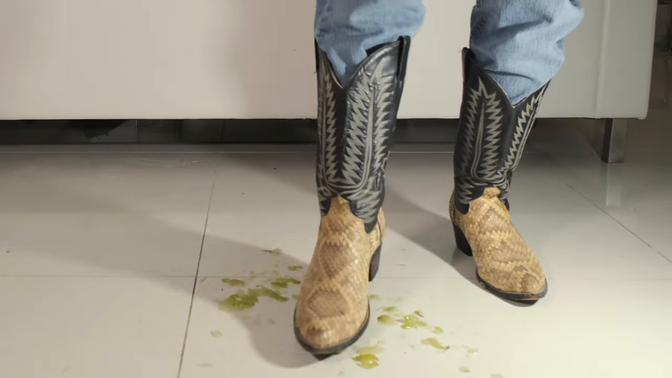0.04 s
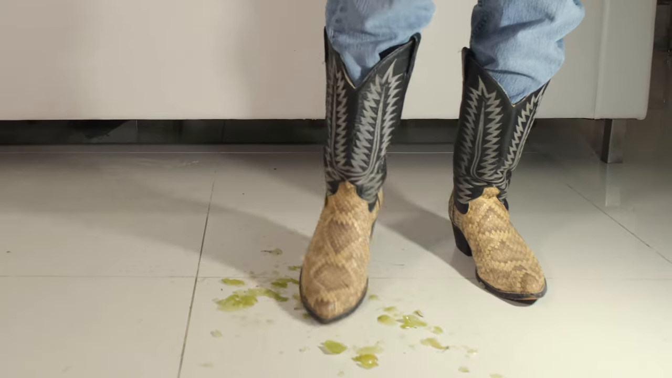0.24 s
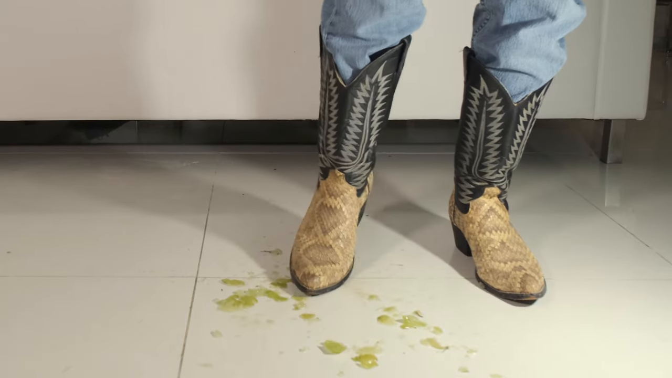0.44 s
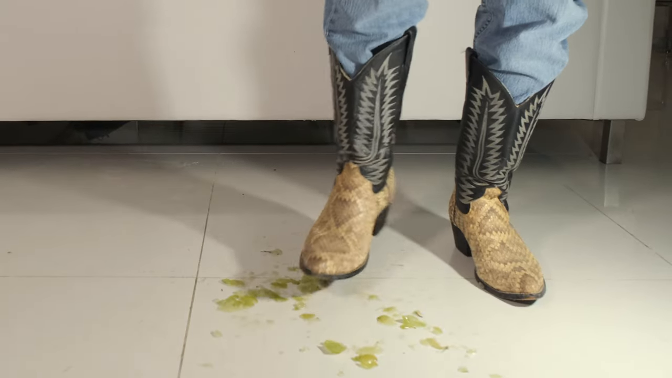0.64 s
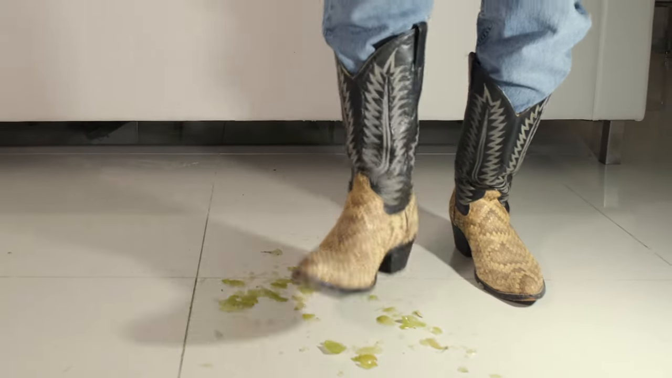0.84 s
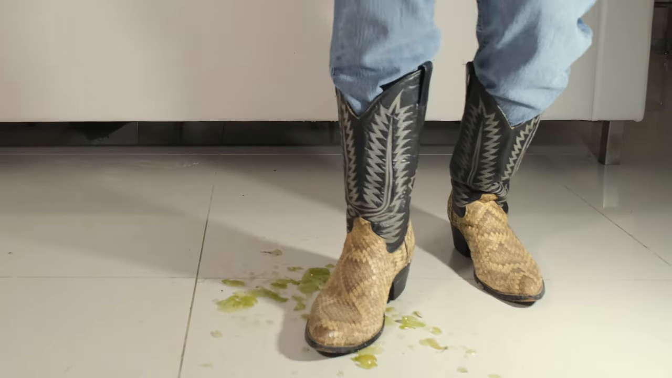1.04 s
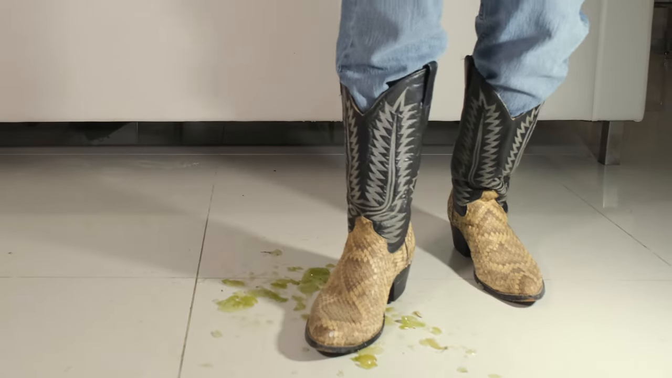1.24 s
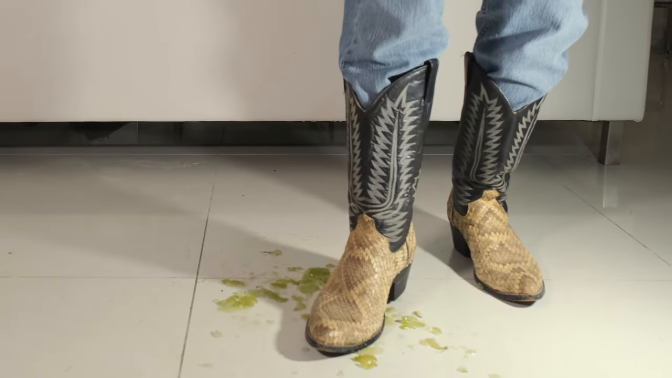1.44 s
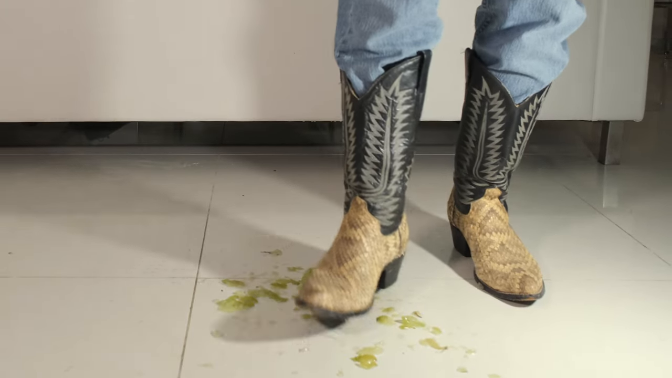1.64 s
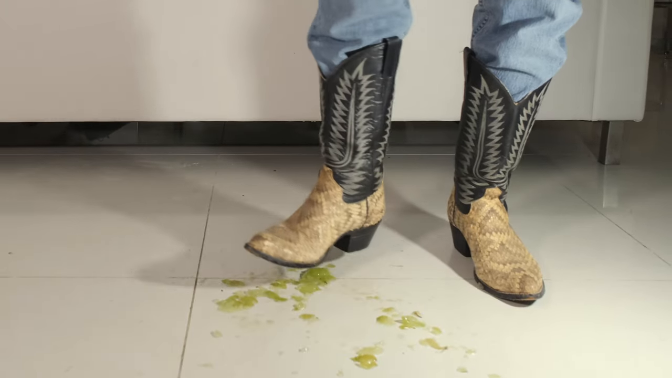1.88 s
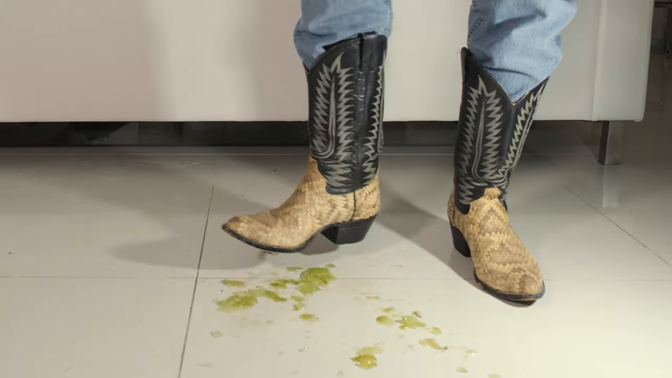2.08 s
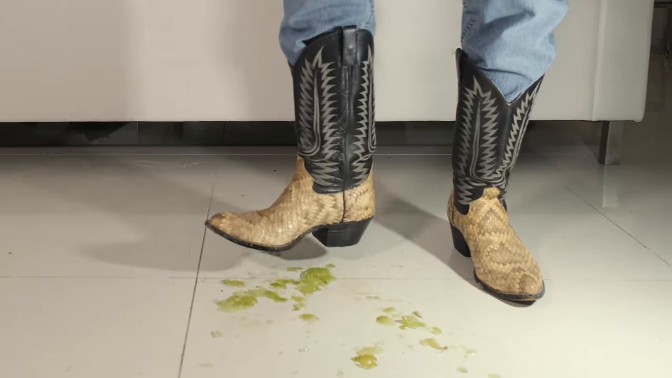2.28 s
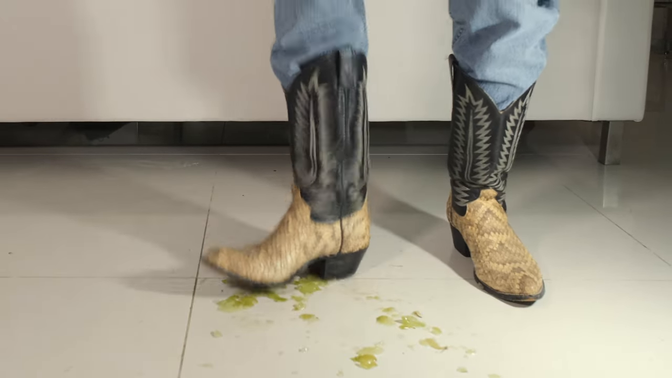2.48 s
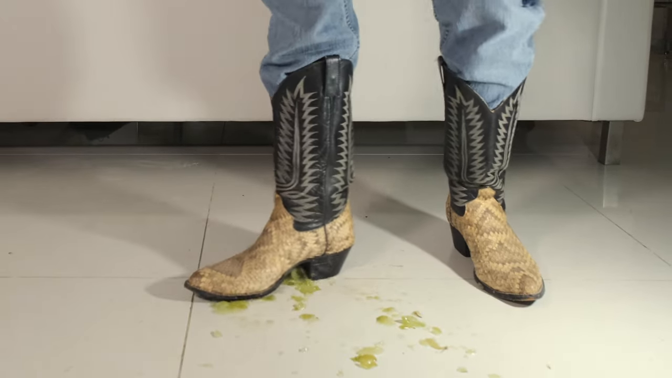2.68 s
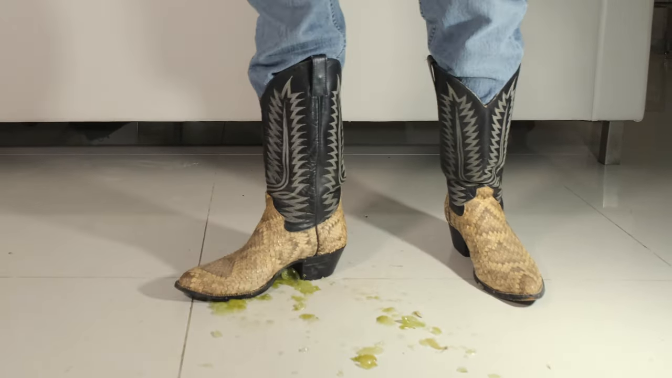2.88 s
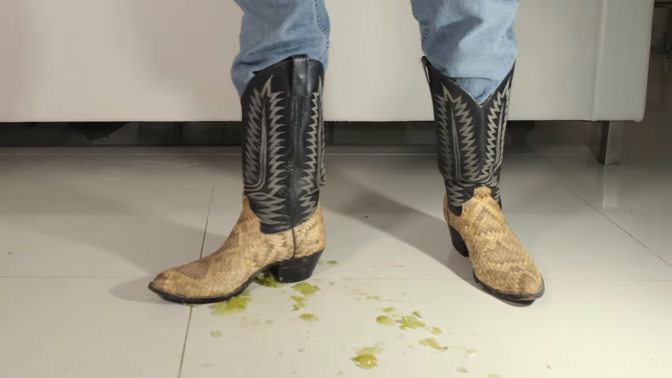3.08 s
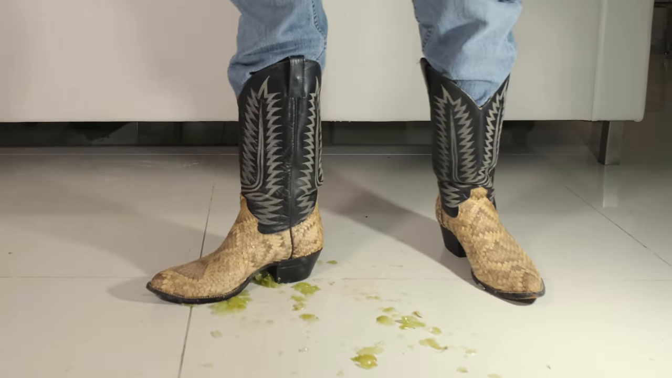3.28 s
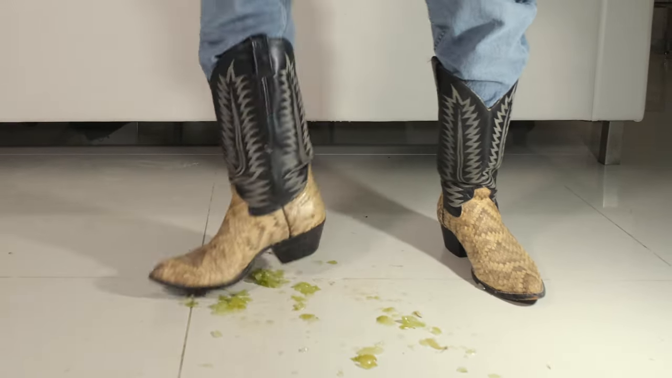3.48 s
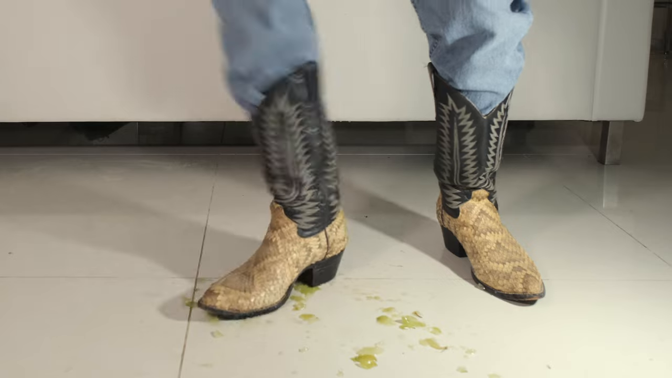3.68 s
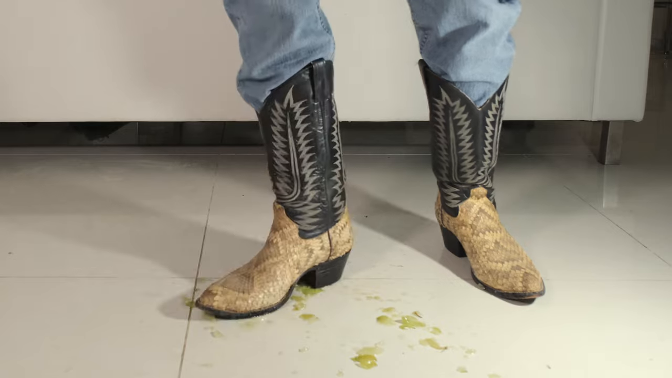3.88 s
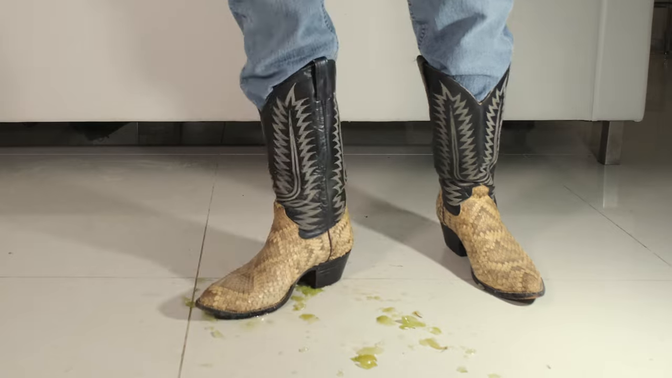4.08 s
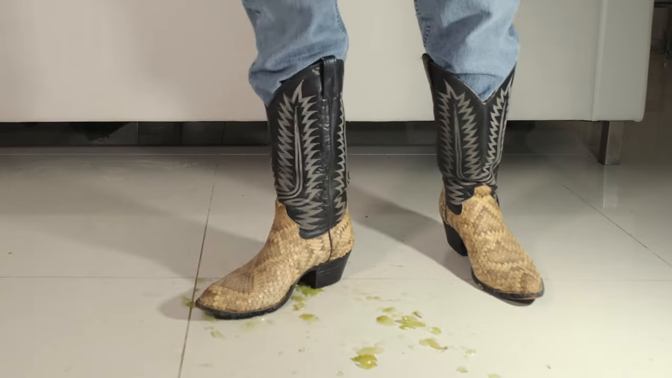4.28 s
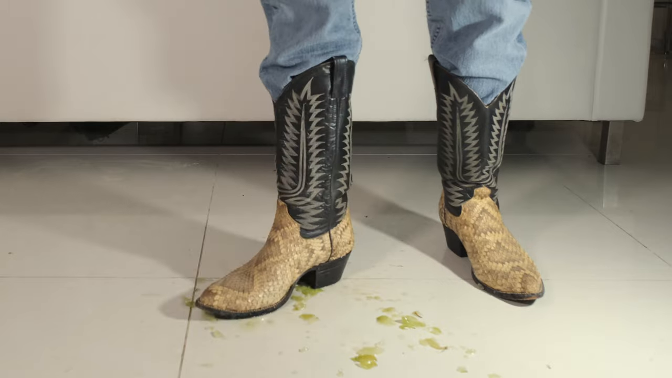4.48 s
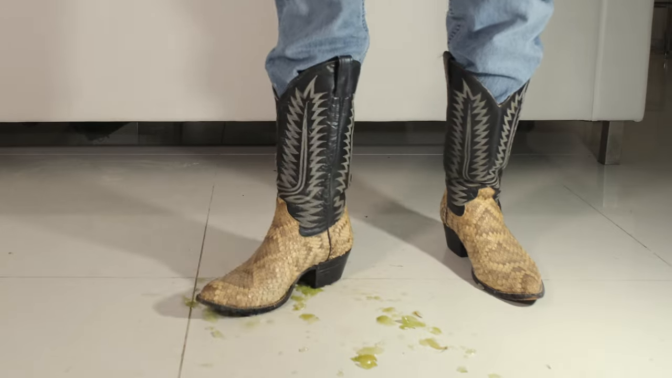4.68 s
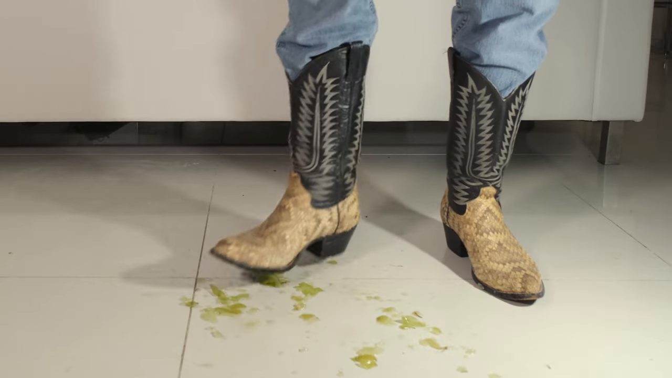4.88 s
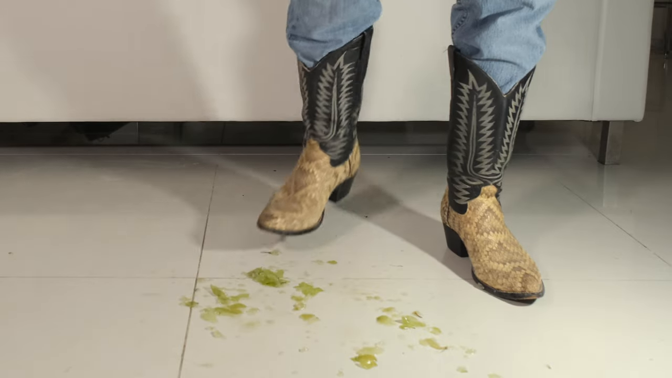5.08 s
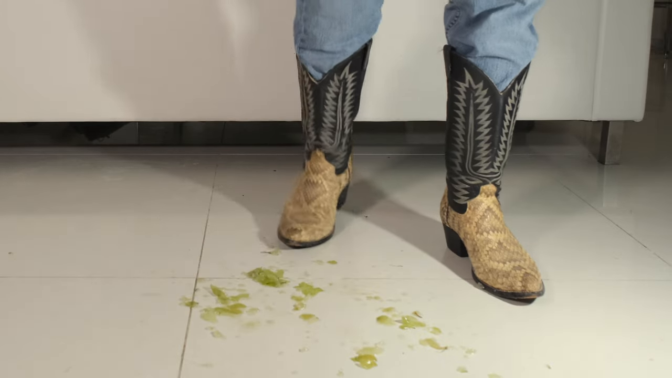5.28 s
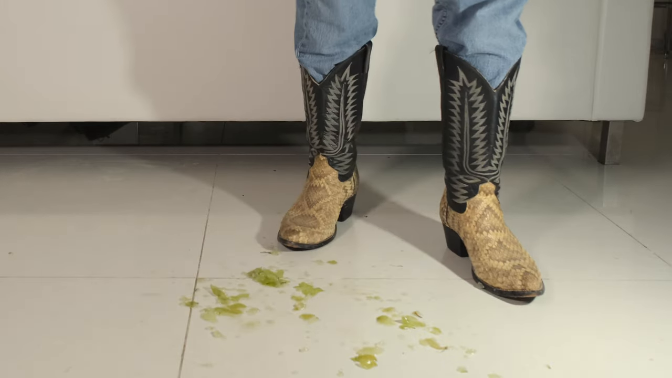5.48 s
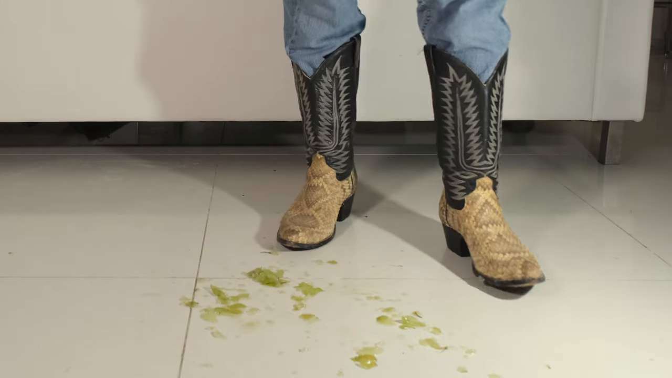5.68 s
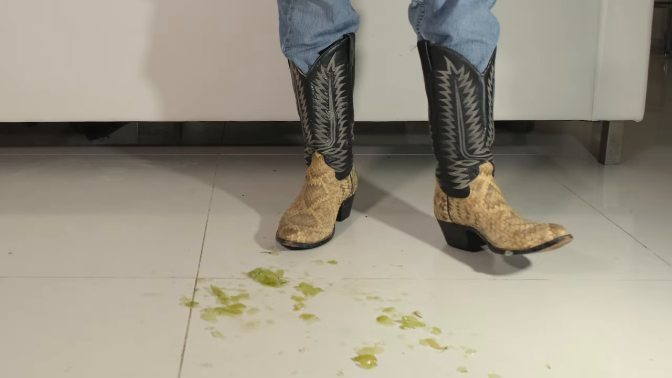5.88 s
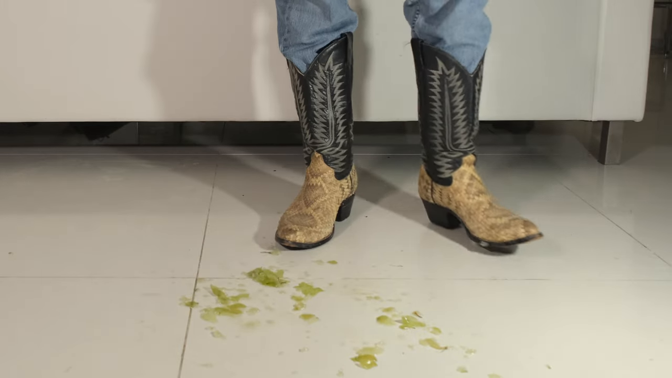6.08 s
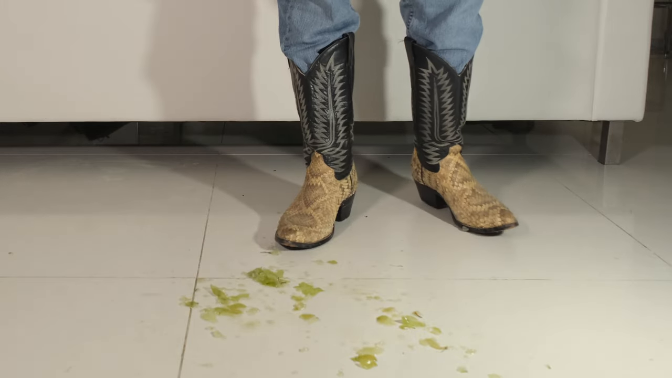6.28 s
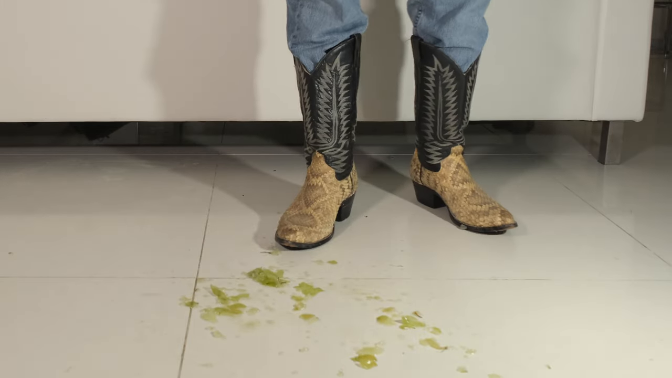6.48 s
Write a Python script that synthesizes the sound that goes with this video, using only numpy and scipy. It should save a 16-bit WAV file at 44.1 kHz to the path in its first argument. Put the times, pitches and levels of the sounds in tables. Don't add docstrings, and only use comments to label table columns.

```python
import sys
import numpy as np
from scipy import signal
from scipy.fft import rfft, irfft, next_fast_len
from scipy.io import wavfile
from scipy.ndimage import uniform_filter1d, map_coordinates

SR = 44100
rng = np.random.default_rng(int(sys.argv[2]) if len(sys.argv) > 2 else 0)


def how_loud(loudness_db):
    steps = np.asarray(loudness_db, float) / 20
    return 10 ** steps


def unload_audio(sound):
    columns = np.transpose(np.atleast_2d(sound))
    steps = np.round(np.clip(columns, -1, 1) * 32767)
    wavfile.write(sys.argv[1], SR, steps.astype(np.int16))


N = 288268


def unit(x):
    return x / np.sqrt(np.mean(x ** 2) + 1e-20)


def along(points, hz):
    point_hz, value = np.transpose(points)
    return np.interp(np.log(hz + 1), np.log(point_hz + 1), value)


def filtered(x, response):
    size = next_fast_len(x.shape[-1] + 8192)
    spectrum = rfft(x, size) * response(np.fft.rfftfreq(size, 1 / SR))
    return irfft(spectrum, size)[..., :x.shape[-1]]


def resonances(modes):
    def mode(f, hz, width_hz, db):
        return how_loud(db) * 1j * f * width_hz / (hz * hz - f * f + 1j * f * width_hz)
    return lambda f: sum((-1) ** k * mode(f, *row) for k, row in enumerate(modes))


def wobble(rate_hz):
    knots = rng.standard_normal(int(N * rate_hz / SR) + 4)
    return map_coordinates(knots, [np.arange(N) * rate_hz / SR])


def add(track, start_s, sound):
    part = track[round(start_s * SR):][:len(sound)]
    part += sound[:len(part)]


def spray(shape, spiky):
    size = np.exp(spiky * rng.standard_normal(len(shape)))
    spectrum = rfft(shape * rng.standard_normal(len(shape)) * size)
    power = np.abs(spectrum) ** 2
    even = irfft(spectrum / np.sqrt(power + 0.01 * np.mean(power)), len(shape))
    return even * np.minimum(shape / (0.31 * shape.max()), 1)


def contact(pair, start_s, peak_db, shocks, colour):
    sound = filtered(shocks, colour)
    sound *= how_loud(peak_db) / np.abs(sound).max()
    shock = filtered(np.arange(len(shocks)) == 300, colour)
    shock *= np.linalg.norm(sound) / np.linalg.norm(shock)
    add(pair[0], start_s, sound)
    add(pair[1], start_s + (np.argmax(np.abs(shocks)) - 300) / SR, shock)


def bursts(events, spiky, share=0, width_hz=0, length_ms=None, order=2):
    pair, ms = np.zeros((2, N)), np.arange(SR // 12) * 1000 / SR
    for start_s, peak_db, hz, *own_ms in events:
        age = ms / (length_ms or own_ms[0])
        ring = resonances([(hz, hz * share + width_hz, 0)])
        shocks = spray(age * np.exp(-age), spiky)
        contact(pair, start_s - 0.0006, peak_db, shocks, lambda f: ring(f) ** order)
    return pair


# frequency in Hz, level in dB.
SIDE_WIDTH = [(60, -37), (110, -54), (200, -55), (380, -35), (700, -14.5), (1290, -4), (2380, -2.5),
              (4400, -0.5), (8120, 0), (15000, 0)]


def diffuse(pair):
    side = filtered(pair[1], lambda hz: how_loud(along(SIDE_WIDTH, hz)))
    return np.array([pair[0] + side, pair[0] - side])


# frequency in Hz, density in dB per Hz.
ROOM_HISS = [(88, -32), (150, -14.5), (165, -7), (205, -7), (244, -11.5), (290, -12), (551, -12),
             (631, -15.5), (948, -14.5), (1270, -18.5), (1540, -18.5), (5650, -33), (15500, -47)]
# frequency in Hz, density in dB per Hz.
DUCT_RUMBLE = [(12, -30), (20, -3), (32, 1), (49, -1.5), (69, 0.5), (81, -2), (103, 0.5), (140, -3.5),
               (168, -32), (193, -9), (220, -19), (290, -82), (480, -120)]
# centre in Hz, width in Hz, level in dB.
FAN_BANDS = [(142.2, 12, -53), (290, 38, -56), (967, 59, -59.5)]
DUCT_TONE_HZ = (64.6, 105)
DUCT_TONE_DB = (-42, -46.5)


def ventilation():
    t = np.arange(N) / SR

    def shaped(response):
        return unit(filtered(rng.standard_normal((2, N)), response))

    rumble = how_loud(-43 + wobble(3.15)) * shaped(lambda hz: how_loud(along(DUCT_RUMBLE, hz)))
    beat_hz, first_swell_s, beat_depth_db = 2.02, 0.555, 1.5
    beat_db = beat_depth_db * np.cos(2 * np.pi * beat_hz * (t - first_swell_s)) + 0.54 * wobble(2.39)
    drift_db = 2.2 * wobble(3.65)
    tones = np.zeros(N)
    for hz, db, swell_db in zip(DUCT_TONE_HZ, DUCT_TONE_DB, [beat_db, drift_db]):
        tones += how_loud(db + swell_db) * np.sin(2 * np.pi * hz * t + 0.69 * wobble(6.3))
    bands = np.zeros((2, N))
    for hz, width_hz, db in FAN_BANDS:
        ring = resonances([(hz, width_hz, 0)])
        bands += how_loud(db) * shaped(lambda f: ring(f) ** 2)
    hiss = how_loud(-49.5 + 0.3 * wobble(2.4)) * shaped(lambda hz: how_loud(along(ROOM_HISS, hz)))
    return diffuse(rumble + bands + hiss) + tones


def strokes(rows):
    t, gain = np.arange(N) / SR, np.zeros(N)
    for start_s, attack_s, hold_s, release_s, db in rows:
        corners_s = start_s + np.cumsum([0, attack_s, hold_s, release_s])
        gain += how_loud(db) * np.interp(t, corners_s, [0, 1, 1, 0]) ** 2
    return gain


def grain(depth_db):
    return rng.standard_normal(N) * how_loud(depth_db * wobble(180))


# start in seconds, attack, hold and
# release in seconds, level in dB.
DENIM_RUBS = [
    (.11, .02, 0.26, 0.14, -49),
    (2.185, 0.0102, 0.0545, 0.33, -46),
    (2.52, .02, 0.027, .04, -22.5),
    (3.35, 0.062, 0.07, 0.022, -42),
    (4.685, 0.014, .004, 0.021, -34),
    (4.735, 0.0135, .02, .08, -44.5),
    (6.16, 0.097, 0.13, 0.176, -48),
]
# frequency in Hz, density in dB per Hz.
DENIM_COLOUR = [(710, -7), (1200, -2), (1740, -3), (3010, -7), (3680, -7.5), (7310, -15.5), (15000, -28.5)]


def rustle():
    cloth = unit(filtered(grain(depth_db=2.5), lambda hz: how_loud(along(DENIM_COLOUR, hz))))
    return how_loud(-7) * strokes(DENIM_RUBS) * cloth


# start in seconds, peak in dB, centre in Hz, length in ms.
PULP_SMACKS = [(0.125, -43, 6500, 2.2), (2.198, -46.5, 7000, 1.2), (3.083, -40, 6000, 1.5),
               (0.123, -37, 3640, 2.9), (0.428, -38.5, 3660, 3), (3.116, -36.5, 3330, 7.3),
               (3.12, -41.5, 900, 5.6), (3.411, -41, 2900, 2), (3.469, -35, 3980, 3.8),
               (3.47, -40.5, 676, 8.96), (3.475, -25.5, 3260, 1.4), (3.482, -24.5, 2620, 2.1),
               (3.484, -25, 1470, 0.88), (5.3205, -33, 9000, 4), (5.3195, -31.5, 1198, 2),
               (5.321, -34, 4010, 4.58), (5.3315, -20, 3560, 0.6)]


def smacks():
    return bursts(PULP_SMACKS, 0.31, share=0.81)


# (frequency in Hz, width in Hz, level in dB).
SOLE_PEELS = [
    ([(0.604, -24.5, 7), (0.6105, -29, 4.5), (0.641, -33, 9)], [(2580, 600, -4.5), (3570, 185, 0.5), (4070, 180, -1.5), (4656, 380, -1), (5050, 105, -3), (5503, 96, -9), (6200, 150, -8.5), (6860, 160, -10.5), (7570, 200, -15), (8170, 400, -16), (9330, 1500, -23)]),
    ([(5.848, -33.5, 6), (5.856, -31.5, 2)], [(2490, 225, 7.5), (3840, 360, -4), (4580, 160, -4), (6200, 540, -20.5), (9000, 1900, -41)]),
]


def peels():
    pair, ms = np.zeros((2, N)), np.arange(SR // 12) * 1000 / SR
    for events, gap in SOLE_PEELS:
        ring = resonances(gap)
        for start_s, peak_db, swell_ms in events:
            age = ms / swell_ms
            shocks = spray(age * np.exp(-age * age / 2), spiky=0.54)
            contact(pair, start_s, peak_db, shocks, lambda f: ring(f) * f ** 4 / (f ** 4 + 2300 ** 4))
    return pair


# start in seconds, level in dB, frequency in Hz, t60 in seconds.
FLOOR_THUMPS = [
    (0.957, -16.5, 76.5, 0.09),
    (2.553, -17, 147, 0.068),
    (2.555, -21.5, 62.84, 0.18),
    (2.569, -27.5, 33.74, 1),
    (3.693, -22, 75, 0.13),
]


def thumps():
    track, t = np.zeros(N), np.arange(SR // 2) / SR
    for start_s, db, hz, t60_s in FLOOR_THUMPS:
        onset = 1 - np.exp(-t / 0.0076)
        add(track, start_s, how_loud(db - 60 * t / t60_s) * np.sin(2 * np.pi * hz * t) * onset)
    return track


# start in seconds, knock in dB, crack in dB, room in dB.
HEEL_STOMPS = [
    (0.9592, -4, -2, -2.5),
    (3.6923, -4.5, 4.5, 0),
    (3.7137, -5, -14, -10.5),
]
# frequency in Hz, width in Hz, level in dB.
HEEL_CRACK = [(785, 53.3, 9.5), (1290, 150, 3.5), (2160, 206, 2), (2800, 420, 2), (3900, 610, 0.5),
              (4970, 700, -4.5), (6200, 1400, -10), (8500, 2500, -12)]
# frequency in Hz, density in dB per Hz.
STOMP_SENT = [
    [(59, -46), (100, -17.5), (123, -8), (156, -7), (378, 2), (457, 4), (654, 3), (843, -10), (1060, -5),
     (1230, -10), (2810, -9.5), (8410, -18.5), (15500, -32)],
    [(59, -54), (100, -21), (192, -16), (326, -7), (378, 2), (429, -7.5), (467, -2), (1310, -17.5),
     (2810, -13.5), (9350, -26.5), (14000, -41), (15500, -51)],
]
# its frequency and width in Hz, then how much each blow rings it in dB.
TILE_MODE = [(2800, 377), (3.4, -28, -20)]


def stomps():
    pair, ms = np.zeros((2, N)), np.arange(SR // 8) * 1000 / SR
    contact_ms, knock_hz, sag_hz_per_ms = 5.55, 507, 20
    pressed = np.sin(np.pi * np.minimum(ms / contact_ms, 1)) ** 0.4
    knock = pressed ** 1.02 * np.sin(2 * np.pi * (knock_hz - sag_hz_per_ms * ms / 2) * ms / 1000)
    sent_by_blow = STOMP_SENT + STOMP_SENT[1:]
    for (start_s, knock_db, crack_db, room_db), sent, tile_db in zip(HEEL_STOMPS, sent_by_blow, TILE_MODE[1]):
        crack = filtered(spray(np.sqrt(pressed) * np.exp(-ms / 4), spiky=1.0), resonances(HEEL_CRACK))
        blow = how_loud(crack_db) * crack / np.abs(crack).max() - how_loud(knock_db) * knock
        tile = resonances([(*TILE_MODE[0], tile_db)])
        shock = filtered(np.arange(len(ms)) == 300, lambda f: how_loud(along(sent, f)) * (2.0 + tile(f)))
        shock *= how_loud(room_db) * np.linalg.norm(blow) / np.linalg.norm(shock)
        add(pair[0], start_s, blow)
        add(pair[1], start_s + 0.0023 - 300 / SR, shock)
    return pair


# start in seconds, peak in dB, centre in Hz.
GRIT_TICKS = [(1.586, -44, 3900), (3.129, -29, 3250), (3.3238, -46, 3640), (4.4656, -31, 1573),
              (4.466, -37, 4032), (4.5052, -45, 2300), (4.5498, -34, 1690), (4.6788, -32, 2800),
              (4.7008, -29.5, 2870), (4.701, -34, 1250), (5.067, -36, 4230), (5.0848, -39, 3050),
              (5.339, -32, 3400), (5.633, -34.5, 3540), (6.3474, -29.5, 1580)]


def ticks():
    return bursts(GRIT_TICKS, 0.282, width_hz=2430, length_ms=0.38, order=4)


# start in seconds, peak in dB, centre in Hz.
LIGHT_TAPS = [
    (1.586, -32, 326.4),
    (3.186, -34, 312),
    (3.335, -43, 266),
    (3.369, -35.5, 378),
    (4.493, -30, 354),
    (5.32, -29.5, 387),
    (5.445, -26.5, 372),
    (6.347, -29.5, 350),
    (6.388, -22.5, 423),
]


def taps():
    return bursts(LIGHT_TAPS, 0.29, share=0.75, length_ms=1.94)


# start in seconds, peak in dB, centre in Hz.
JUICE_SPITS = [(1.797, -51.5, 9100), (3.089, -38, 9750), (3.092, -36, 4940), (3.118, -37, 6040),
               (3.477, -45.5, 6700), (3.487, -37, 9400), (3.491, -40, 9640), (4.701, -39, 8500),
               (4.745, -52, 8700), (4.761, -36.5, 4800), (5.02, -45.5, 7660), (5.3315, -22, 6900),
               (5.332, -26.5, 10800), (5.339, -26, 7200), (5.343, -28, 7660), (5.347, -31, 8000),
               (5.753, -40.5, 5950), (5.785, -52, 9400), (5.797, -44, 6000), (5.813, -51, 10500),
               (5.814, -45, 6840), (5.866, -44, 6740)]


def spits():
    return bursts(JUICE_SPITS, 0.25, width_hz=1950, length_ms=0.75)


# start in seconds, attack, hold and release in seconds, level in dB.
LEATHER_SCUFFS = [
    (1.878, 0.013, 0.033, 0.036, -50.5),
    (1.9, .06, 0.022, 0.085, -44),
    (3.05, .025, 0.032, 0.057, -47),
]
# frequency in Hz, width in Hz, level in dB.
SOLE_MODES = [(2370, 480, 2), (4200, 530, -3), (4840, 210, 1.5), (6300, 400, -5), (9000, 3400, -16),
              (900, 440, -1.5)]


def scuffs():
    leather = unit(filtered(grain(depth_db=-2.5), resonances(SOLE_MODES)))
    return how_loud(-3) * strokes(LEATHER_SCUFFS) * leather


# start in seconds, peak in dB, brightness in dB per octave.
FRUIT_BURSTS = [
    (2.5208, -14, 2),
    (2.5266, -14, 3.5),
    (2.533, -17, -4.5),
    (2.5395, -16, 8.5),
    (2.5443, -6.5, 0.2),
    (2.548, -8.5, 0.7),
    (2.552, -10.5, 11),
    (2.559, -18, 8),
    (2.566, -16.5, -6.5),
]
# frequency in Hz, density in dB per Hz.
FRUIT_COLOUR = [(59, -38), (100, -8.5), (196, -8), (223, -5.5), (281, -3.5), (487, -8.5), (977, -7.5),
                (1060, -18), (3120, -8.5), (5070, -13.5), (9350, -22), (15500, -42.5)]
# frequency in Hz, width in Hz, level in dB.
ARCH_POCKET = [(3200, 340, 0), (4890, 540, 3)]


def squash():
    pair, swell_ms = np.zeros((2, N)), 2.9
    age = np.arange(SR // 12) * 1000 / SR / swell_ms
    pocket = resonances(ARCH_POCKET)
    for start_s, peak_db, bright_db in FRUIT_BURSTS:
        def colour(f):
            tilt_db = bright_db * np.log2(f / 2000 + 0.048)
            return how_loud(along(FRUIT_COLOUR, f) + tilt_db) * np.hypot(1, np.abs(pocket(f)))
        contact(pair, start_s, peak_db, spray(age * np.exp(-age * age / 2), spiky=0.204), colour)
    return pair


# start in seconds, peak in dB, centre in Hz.
SOLE_SLIPS = [
    (3.4755, -27, 4200),
    (3.483, -22, 2800),
    (3.4935, -21, 2830),
    (3.5015, -25.5, 2850),
    (5.067, -32.5, 3350),
]


def slips():
    return bursts(SOLE_SLIPS, 0.3, width_hz=920, length_ms=1)


# start in seconds, peak in dB, centre in Hz.
HOLLOW_HEEL_TAPS = [
    (4.526, -35, 377),
    (5.083, -38, 466),
    (5.854, -29, 470),
    (5.926, -31, 458),
    (6.349, -30, 775),
    (6.385, -31, 825),
    (6.402, -26, 340),
    (6.415, -31, 405),
]


def heel_taps():
    return bursts(HOLLOW_HEEL_TAPS, 0.26, share=0.35, length_ms=1.94)


# frequency in Hz, t60 in seconds.
ROOM_T60 = [(100, 0.64), (300, 0.53), (700, 0.65), (1500, 0.74), (3500, 0.89), (7000, 0.7), (14000, 0.49)]
# frequency in Hz, level in dB.
ROOM_COLOUR = [(100, 2.5), (1000, 2.5), (15000, 2)]
# delay in ms, level in dB.
WALL_ECHOES = [(5.5, -20), (11, -19), (17, -23), (26, -22), (33, -24)]


def room(direct, sent):
    out, turn = np.zeros((2, N)), np.arange(N) * 5 // SR
    for k in range(4):
        hz, t, z = signal.stft(rng.standard_normal((2, SR * 5 // 4)), SR, nperseg=256)
        decay = how_loud(-60 * t / along(ROOM_T60, hz)[:, None])
        tail = signal.istft(z * decay, SR, nperseg=256)[1]
        tail *= 1 - np.exp(-np.arange(tail.shape[1]) / SR / 0.0009)
        feed = sum(x * ((turn + i) % 4 == k) for i, x in enumerate(sent))
        out += signal.fftconvolve(feed[None], tail / np.linalg.norm(tail[0]), axes=1)[:, :N]
    for delay_ms, db in WALL_ECHOES:
        echo = np.pad(direct, (round(delay_ms * SR / 1000), 0))[:N]
        out += how_loud(db) * np.array([[1], [rng.uniform(-1.95, 1.0)]]) * echo
    return diffuse(filtered(out, lambda hz: how_loud(along(ROOM_COLOUR, hz))))


def scene():
    sources = [(stomps(), -0.5), (smacks(), 0.5), (spits(), -3.0), (taps(), 1.0), (squash(), -4.5),
               (peels(), -2.5), (ticks(), -2.5), (heel_taps(), -4.5), (slips(), -5.5)]
    rub = scuffs() + rustle()
    direct = rub + thumps() + sum(pair[0] for pair, _ in sources)
    sent = [how_loud(room_db) * pair[1] for pair, room_db in sources] + [how_loud(-4.5) * rub]
    side = filtered(direct, lambda f: 1j * f * f / (f * f + 1800 ** 2))
    near = direct + how_loud(-4) * np.array([[1], [-1]]) * side
    return near + room(direct, sent) + ventilation()


def band_limit(x):
    return signal.sosfilt(signal.butter(12, 15660, fs=SR, output="sos"), x)


def record(dry):
    loudness = uniform_filter1d(np.abs(dry).max(0), 132)
    over_db = 20 * np.log10(np.maximum(loudness / 0.14, 1))
    ms = np.arange(SR // 2) * 1000 / SR
    react = np.exp(-ms / 40) * (1 - np.exp(-(ms / 4) ** 2))
    duck_db = np.minimum(signal.fftconvolve(over_db, react)[:N] * 0.0015, 6)
    x = dry * how_loud(-duck_db)
    clipped = x / (1 + np.abs(x / 1.03) ** 10) ** (1 / 10)
    return band_limit(clipped)


dry = scene()
out = record(dry)
unload_audio(out)
```